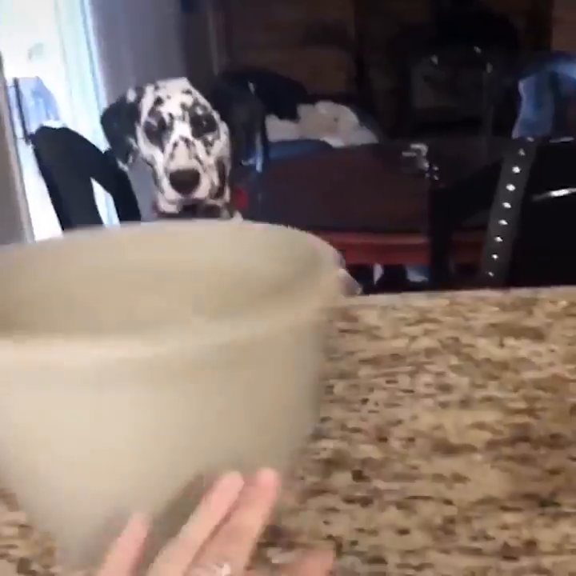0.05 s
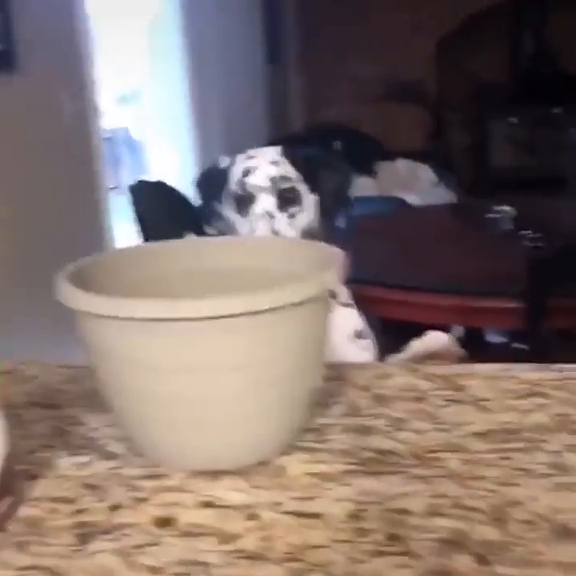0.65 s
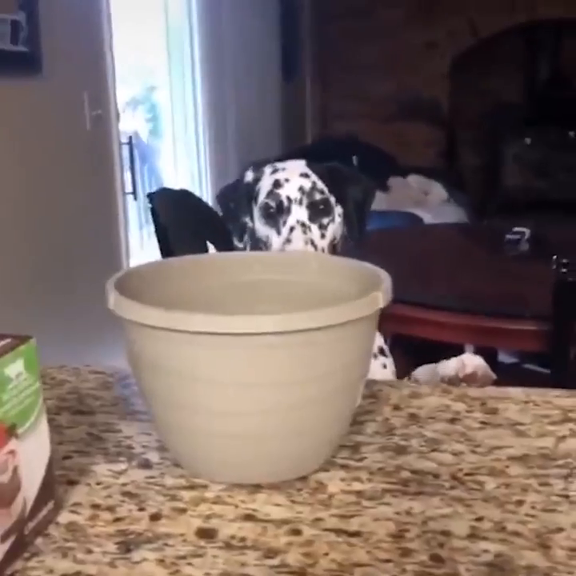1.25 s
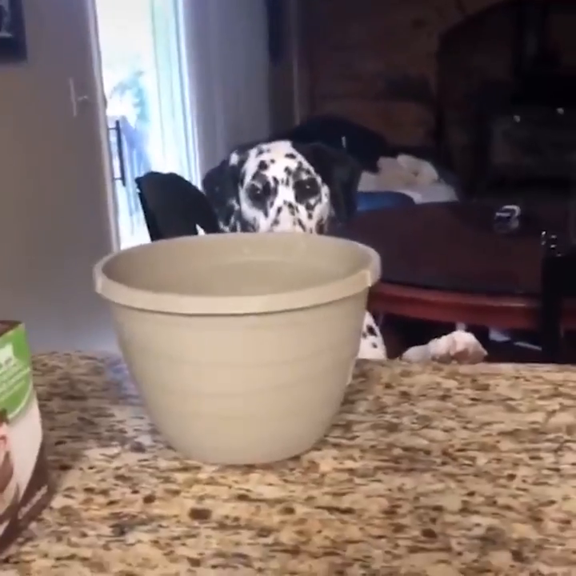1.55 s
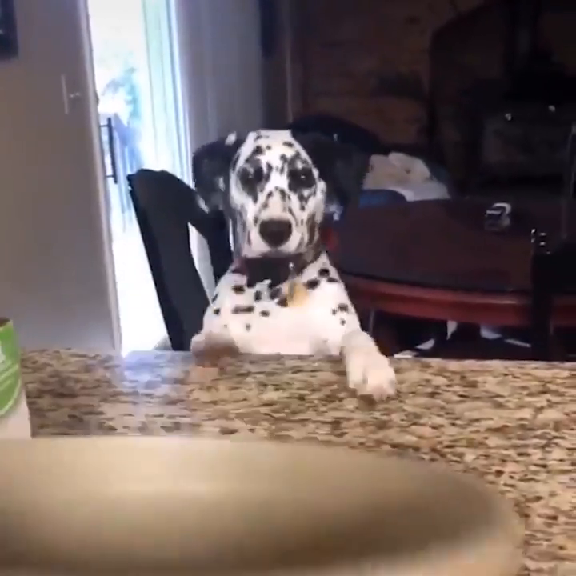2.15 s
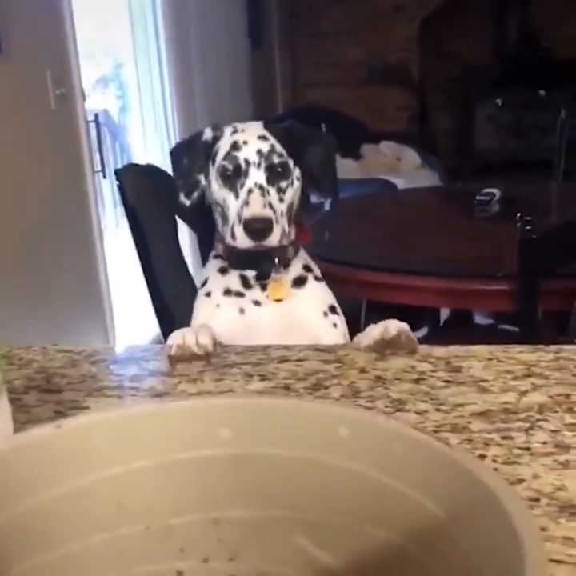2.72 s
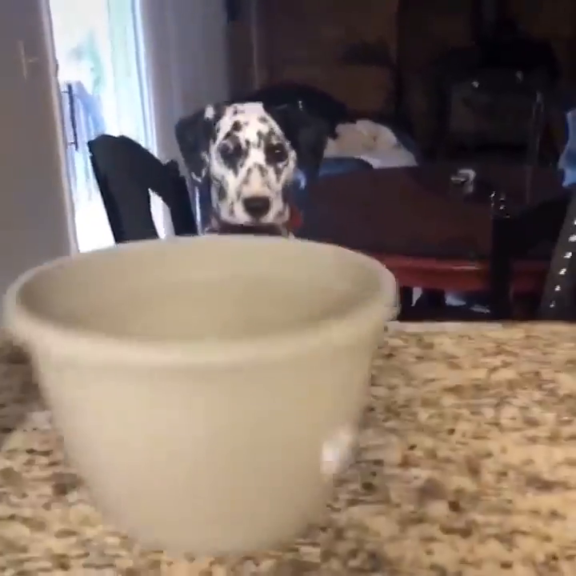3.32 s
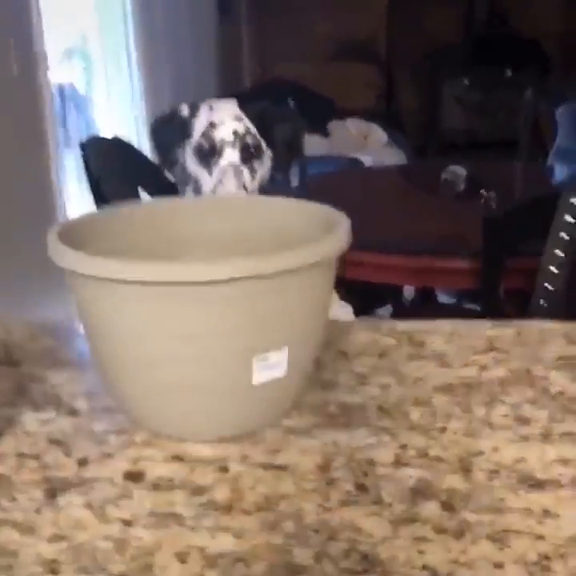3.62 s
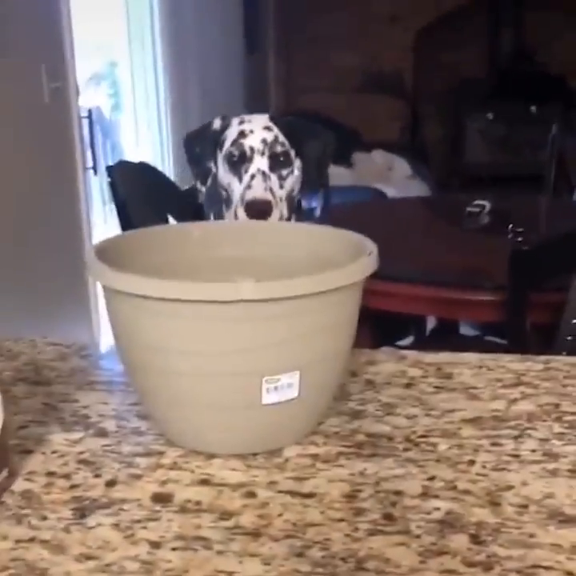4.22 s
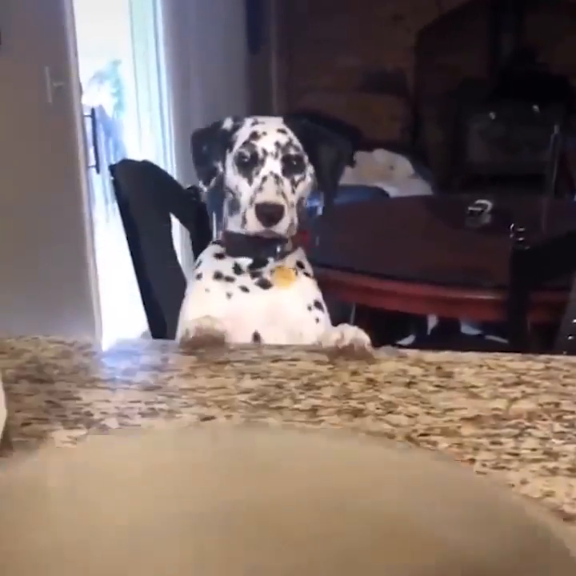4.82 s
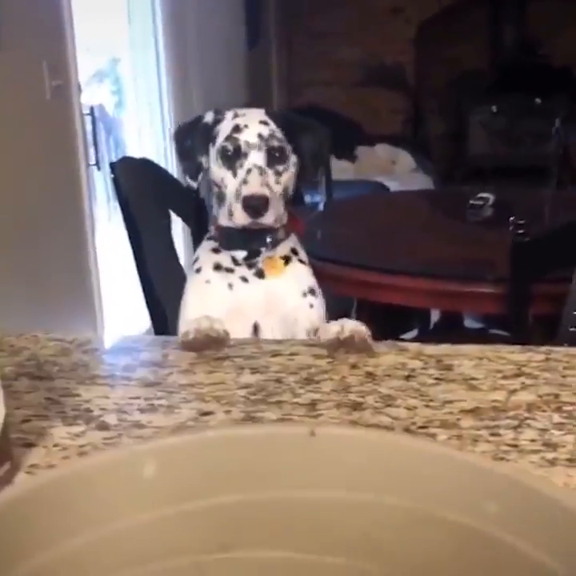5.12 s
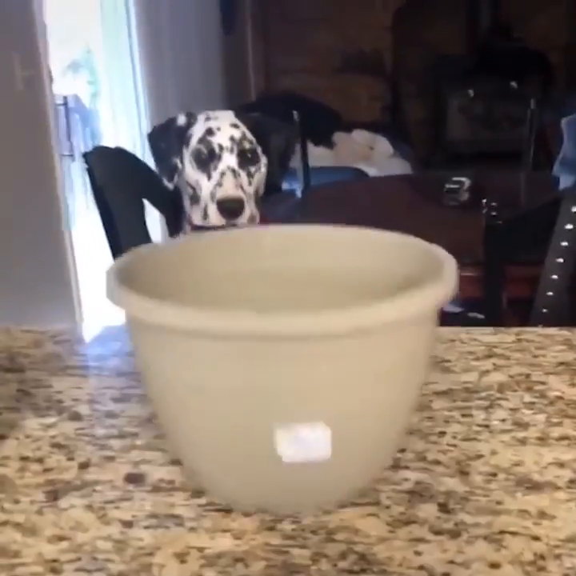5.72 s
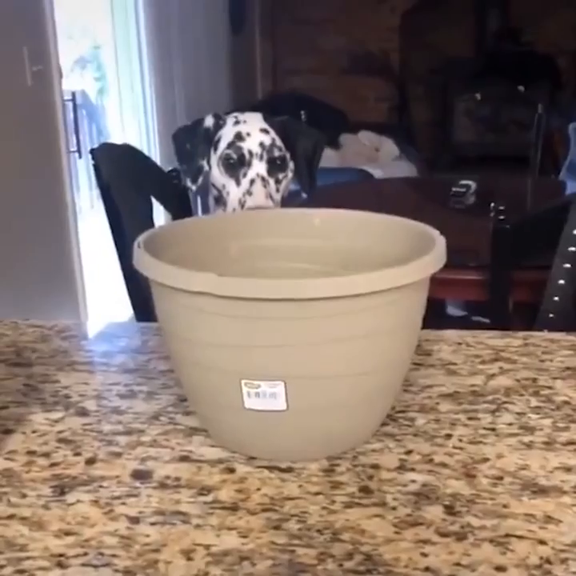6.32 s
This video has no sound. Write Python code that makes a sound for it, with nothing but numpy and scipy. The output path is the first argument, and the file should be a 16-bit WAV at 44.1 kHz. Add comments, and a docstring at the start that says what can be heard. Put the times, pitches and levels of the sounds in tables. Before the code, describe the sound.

An empty plastic flower pot is pushed and pulled across a stone countertop, scraping, knocking and thudding in an echoing kitchen.

```python
"""An empty plastic flower pot is pushed away and pulled back over a stone countertop, five moves in all.
Its base rasps on the stone, judders as it breaks loose and knocks as it rocks. Its thin wall clicks
and bends with low thuds. A hard kitchen echoes every sound, more so when the pot is far away.
Behind it all are soft room air and a faint hum that slowly swells and sinks."""
import sys
import numpy as np
from scipy import signal
from scipy.fft import rfft, irfft
from scipy.io import wavfile
from scipy.ndimage import uniform_filter1d

SR = 44100
rng = np.random.default_rng(int(sys.argv[2]) if len(sys.argv) > 2 else 0)


def materialize(psi):
    """Save the field psi as 16-bit PCM at rate SR to the path in sys.argv[1].

    A 1-D psi becomes a single channel; in a 2-D psi each row is a channel.
    """
    bounded = np.clip(np.atleast_2d(psi).T, -1, 1)
    quanta = np.round(bounded * 32767).astype(np.int16)
    wavfile.write(sys.argv[1], SR, quanta)


N = 289296

# the thin sound of a light touch on the wall: body/dB, knock/dB, tick/dB, clack/dB
LIGHT_TOUCH = (-11.5, -11, -13, 0)


def amp(db):
    """Turns decibels into a gain."""
    return 10 ** (np.asarray(db) / 20)


def unit_rms(x):
    """Scales a signal to an average (rms) level of 1."""
    return x / np.sqrt(np.mean(x ** 2) + 1e-20)


def value_at(points, hz):
    """Reads between the rows of a table, on a log-frequency axis."""
    f, value = np.transpose(points)
    return np.interp(np.log(hz + 1), np.log(f + 1), value)


def add(mix, start_s, sound):
    """Mixes a sound in at the given time."""
    part = mix[max(round(start_s * SR), 0):][:len(sound)]
    part += sound[:len(part)]


def band(x, lo_hz, hi_hz, order=2):
    """Keeps what lies between two frequencies."""
    return signal.sosfilt(signal.butter(order, [lo_hz, hi_hz], "band", fs=SR, output="sos"), x)


def coloured(x, spectrum):
    """Shapes the lows and highs of a scene-long sound, at level 1."""
    gains = amp(value_at(spectrum, np.fft.rfftfreq(N, 1 / SR)))
    return unit_rms(irfft(rfft(x) * gains, N))


def room_air(level_db=-55.5):
    """The still air of the room: a soft, deep noise."""
    # colour of the air: f/Hz, relative level/dB
    spectrum = [(15, -48.5), (25, -23.5), (58, -1.5), (81, -18), (127, -6), (144, -22), (178, -8),
                (214, -13.5), (351, -11), (380, -21.5), (411, -11.5), (548, -24), (694, -23.5),
                (1030, -30.5), (13000, -52)]
    return amp(level_db) * coloured(rng.standard_normal(N), spectrum)


def hum(hz=176, level_db=-58.5, waver_hz=1.49, beat_s=0.847, peak_s=0.93, depth=0.43):
    """A faint tone that wavers in pitch and swells in a slow beat."""
    t = np.arange(N) / SR
    beat = 1 + depth * np.cos(2 * np.pi * (t - peak_s) / beat_s)
    pitch = hz + waver_hz * unit_rms(uniform_filter1d(rng.standard_normal(N), size=4000))
    return amp(level_db) * beat * unit_rms(np.sin(2 * np.pi * np.cumsum(pitch) / SR))


def room_tail(build_s=0.0057, echoes_per_s=5000):
    """Crowded echoes build up, then die away at a different speed for each frequency."""
    # how long the kitchen rings: f/Hz, time to fall 60 dB/s
    ring_times = [(100, 1.13), (400, 0.716), (1500, 0.76), (4000, 0.63), (12000, 1.23)]
    # colour of its ringing: f/Hz, level/dB
    colour = [(80, -13), (220, -2), (420, -5.5), (800, -8.5), (2000, -6.5), (5000, -6), (12000, -10.5)]
    t = np.arange(SR) / SR
    echoes = rng.choice([-1., 1.], SR) * (rng.random(SR) < echoes_per_s / SR)
    echoes *= 1 - np.exp(-(t / build_s) ** 2)
    hz, times, bands = signal.stft(echoes, SR, nperseg=256)
    bands *= amp(-60 * times / value_at(ring_times, hz)[:, None])
    size = np.linalg.norm(signal.istft(bands, SR, nperseg=256)[1])
    bands *= amp(value_at(colour, hz))[:, None]
    return signal.istft(bands, SR, nperseg=256)[1] / size


def kitchen(pot, even_m=0.48, growth=0.55, change_hz=1.7, tails=3):
    """The room answers with a few dull echoes and a shifting tail, louder when the pot is far."""
    # how far away the pot is: t/s, distance/m
    path = [(0, 0.81), (.7, 0.56), (2.031, 0.54), (2.35, .28), (3.199, 0.43), (3.7, 0.53), (4.62, 0.67),
            (4.88, 0.32), (5.46, 0.34), (5.9, 0.72)]
    # echoes from counter, cupboards, ceiling and walls: delay/s, gain
    echoes = [(.0047, 0.23), (.0092, 0.12), (0.0145, 0.062), (0.024, 0.08), (0.032, 0.14), (0.043, 0.094),
              (0.058, 0.21)]
    t = np.arange(N) / SR
    metres = np.interp(t, *np.transpose(path))
    sent = pot * (metres / even_m) ** growth
    out = np.zeros(N)
    for k in range(tails):  # the tails take turns, like the changing echoes of a moving pot
        share = np.sqrt(2 / tails) * np.cos(2 * np.pi * (change_hz * t + k / tails))
        out += signal.fftconvolve(sent * share, room_tail())[:N]
    dulled = band(sent, 117.8, 2000, order=1)
    for delay, gain in echoes:
        add(out, delay, gain * dulled)
    return out


def bumps(span=1.375):
    """Dull rubs and bumps of the pot's body make short swells of rumble."""
    # each bump: t/s, level/dB, length/s, middle f/Hz
    swells = [(.31, -47, 0.11, 130), (0.581, -50.5, .07, 250), (1.138, -48.5, 0.14, 90),
              (1.194, -47.5, 0.16, 122), (2.069, -27.5, 0.18, 320), (2.21, -20, 0.046, 119.8),
              (2.796, -51, 0.11, 105.6), (2.791, -40.5, 0.081, 345), (4.155, -44, .09, 98),
              (4.7, -40, 0.12, 96.5), (4.962, -28, 0.086, 100), (5.528, -36, 0.079, 335)]
    out = np.zeros(N)
    for start, db, length, hz in swells:
        progress = np.linspace(0, 1, int(length * SR))
        rumble = band(rng.standard_normal(SR), hz / span, hz * span)[-len(progress):]
        add(out, start, amp(db) * unit_rms(rumble) * np.sin(np.pi * np.sqrt(progress)))
    return out


def flexes(glide_s=0.01044):
    """The wall bends under the hand. Slow, low waves arrive last, so each thud falls in pitch."""
    # each thud: t/s, peak level/dB, starting f/Hz, time to the peak/s
    thuds = [(.109, -31.5, 270, 0.0065), (2.068, -29.5, 260, 0.024), (2.078, -25, 439, 0.0067),
             (2.221, -22, 345, 0.0036), (2.245, -21, 152, 0.0084), (3.206, -17.5, 287, 0.0087),
             (3.227, -29, 85, .012), (4.939, -21.5, 289, .011), (5.474, -25.5, 310, 0.0084),
             (5.501, -34, 128, .013)]
    out, t = np.zeros(N), np.arange(SR // 5) / SR
    for start, db, hz, peak_s in thuds:
        cycles = np.cumsum(hz / (1 + t / glide_s) ** 1.103) / SR
        swell = t / peak_s * np.exp(1 - t / peak_s)
        add(out, start, amp(db) * swell * np.sin(2 * np.pi * cycles))
    return out


def ring(t, spread_db=0.5, detune=0.031, wall_above_hz=600):
    """The pot's own notes after one blow; those of the wall vary with the grip and the spot hit."""
    # notes of the base and wall: f/Hz, level/dB, time to fall 60 dB/s
    shell = [(313, -18.5, 0.047), (425, 2, 0.014), (695, -4, 0.02), (933, -5.5, 0.038), (1103, -4, .016),
             (1365, -4, 0.023), (1613, 9, 0.01), (1790, -7, 0.062), (2110, -7, 0.0084), (2367, -13, 0.031),
             (2766, -20.5, 0.093), (3817, 5, 0.0068), (4430, -45, .012)]
    # longer notes of the hollow inside: same columns
    hollow = [(247, -22, .14), (330, -22, .12), (374, -20, .17), (456, -13, .2), (499, -19, .16)]
    notes = np.vstack([shell, np.add(hollow, (0, -1, 0))])  # the hollow is turned down 1 dB
    hz, db, ring_s = notes.T[:, :, None]
    softer, phase, shift = rng.standard_normal((3, len(notes), 1)) * (hz > wall_above_hz)
    hz = hz * (1 + detune * shift)
    fade = amp(db - spread_db * softer - 60 * t / ring_s)
    return (fade * np.sin(2 * np.pi * hz * t + np.pi * phase)).sum(0)


def crack(samples=380, rise_s=.0015, fade_s=.0015):
    """A few milliseconds of crushed grit, nearly equally strong at all frequencies."""
    t = np.arange(samples) / SR
    burst = rng.standard_normal(samples) * np.exp(-t / fade_s) * (1 - np.exp(-t / rise_s))
    spectrum = rfft(burst)
    flattened = irfft(spectrum / (abs(spectrum) + 1e-9) ** .8, samples)
    return unit_rms(flattened * np.cos(np.pi / 2 * t / t[-1]))


def contact(levels_db, clack_hz, clack_span=1.508, body_lag_s=0.001):
    """One blow cracks and rings, heard as body, knock, tick and clack; the hollow body answers last."""
    # ranges of the body, knock and tick: lowest f/Hz, highest f/Hz
    ranges = [(215, 600), (600, 1300), (4500, 14000)]
    t = np.arange(SR // 2) / SR
    out, crunch = np.zeros((2, len(t)))
    add(crunch, 0, amp(-3.5) * crack())
    blow = ring(t) + band(crunch, 800, 9450)
    parts = [band(blow, *edges, order=3) for edges in ranges]
    parts.append(band(blow, clack_hz / clack_span, clack_hz * clack_span))
    for part, db, lag in zip(parts, levels_db, (body_lag_s, 0, 0, 0)):
        attack = part[:int(.012 * SR)]  # each level applies to the first 12 ms
        add(out, lag, amp(db) * part / np.sqrt(np.mean(attack ** 2)))
    return out


def clicks():
    """Light touches on the thin wall: the pitch depends on where they land, and hard ones tick more."""
    # each touch: t/s, strength/dB, clack f/Hz, hardness/dB
    touches = [(0.094, -44, 1740, 6), (1.165, -62, 1500, 6.5), (1.277, -58.5, 1700, 0.5),
               (1.319, -63, 1490, 1), (1.4466, -59, 2900, 8.5), (1.92, -64, 4200, 4),
               (2.0428, -25.5, 2000, -9), (2.055, -30, 2100, -12), (2.717, -47, 1830, -6),
               (3.2032, -39, 1620, -2.5), (3.26, -31, 3500, 8), (4.163, -65, 1910, 4),
               (4.626, -34, 2610, -1), (4.841, -43.5, 1785, -1), (4.856, -34.5, 1722, -0.5),
               (5.06, -39.5, 1420, -6), (5.471, -38, 2030, 1), (5.476, -35, 1770, -4),
               (5.666, -33, 2060, -10), (5.991, -47.5, 2840, 5.5), (6.147, -61.5, 2700, 10.5)]
    out = np.zeros(N)
    for start, db, hz, hardness_db in touches:
        add(out, start, contact(db + np.add(LIGHT_TOUCH, (0, 0, hardness_db, 0)), hz))
    return out


def knocks(clack_hz=1780, tick_db=-14):
    """The base lands or rocks: flat landings sound the hollow body, hard edge-on ones clack and tick."""
    # each landing: t/s, strength/dB, extra body/dB, lean from knock to clack/dB, hardness/dB
    landings = [(.105, -26.5, 10.5, -0.5, -10), (0.1435, -30, 9, -2.5, -1.5), (.231, -34, 1, 5.5, 16.5),
                (.3166, -33, 5.5, 0.5, 8), (.511, -44, -5, 0, 10), (.5559, -46, 3.5, 2, 17),
                (.775, -60.5, -10, -5, 2), (0.837, -58.5, -16, -5.5, -1), (2.0788, -25, 4.5, -3, 3.5),
                (2.1851, -26, 0.5, -1, -10.5), (2.2096, -29.5, 15, 2, 3), (2.2219, -20.5, 3, -2.5, -1),
                (2.2631, -23.5, -4, -1, 0), (2.2897, -29.5, -20, 1, -3), (2.3106, -37, 5.5, -7.5, -14),
                (2.4424, -29, -3, -2, 2), (2.602, -42.5, -2.5, -1.5, 3), (2.7891, -38, 2.5, -2.5, -12),
                (3.2764, -24.5, 4.5, -3, -1), (3.344, -25, 11.5, -0.5, 2), (3.4075, -38.5, 18, -7, 2),
                (3.4386, -34, 10.5, -4, -3.5), (3.795, -46, -3, -0.5, -20.5), (4.888, -17, 9, -1.5, -2),
                (4.9286, -37, 12, -9, 8.5), (4.9637, -27, 3.5, -1, -1), (5.104, -19, 4, -2, -5),
                (5.1301, -40.5, 16, 6.5, -4), (5.28, -50, -13, -1, -11), (5.519, -25.5, 3.5, 0.5, -26),
                (5.56, -41.5, 13.5, 2, 5), (5.6227, -41.5, 4.5, 6.5, 5), (5.7125, -44, -2, 1, -5),
                (5.9329, -48, 3, 2.5, 9.5)]
    out = np.zeros(N)
    for start, db, body_db, lean_db, hardness_db in landings:
        levels_db = db + np.array([body_db, -lean_db, tick_db + hardness_db, lean_db])
        add(out, start, contact(levels_db, clack_hz))
    return out


def grit(specks_per_s=13, strength_db=-4.5, spread_db=3):
    """Specks caught under the base make the wall click now and then."""
    # where they ring the wall: f/Hz
    pitches = [1300, 1900, 2700, 3800]
    out = np.zeros(N)
    for hz in pitches:
        sizes = amp(strength_db + spread_db * np.clip(rng.standard_normal(N), -2, 2))
        specks = sizes * (rng.random(N) < specks_per_s / len(pitches) / SR)
        out += signal.oaconvolve(specks, contact(LIGHT_TOUCH, hz))[:N]
    return out


def stone_grain(rub, spread_db=3):
    """The stone's grain changes under the base, so the colour of the rubbing keeps shifting."""
    bands = signal.stft(rub, SR, nperseg=256)[2]
    blur = np.outer(np.hanning(9), np.hanning(13))  # across frequency and time
    patches = unit_rms(signal.oaconvolve(rng.standard_normal(bands.shape), blur, "same"))
    return unit_rms(signal.istft(bands * amp(spread_db * patches), SR, nperseg=256)[1][:N])


def friction(slips_per_s=3200, spread_db=3.5, smooth_gain=0.67):
    """Tiny slips of the base give two sounds: a rasp that rings the wall, and the contact's own hiss."""
    # colour of the rasp: f/Hz, relative level/dB
    rasp = [(100, 2), (200, -10.5), (460, -5), (620, -8.5), (850, -2.5), (1100, 0.5), (1350, -6.5),
            (1700, -4.5), (2100, -8.5), (2700, -8), (3300, -11.5), (3800, -9), (5000, -19.5), (7000, -37.5)]
    # colour of the hiss: f/Hz, relative level/dB
    hiss = [(3000, -15.5), (4600, -2), (5500, -1.5), (7000, -0.5), (10000, -1.5), (13000, -3.5)]
    sizes = amp(spread_db * np.minimum(rng.exponential(1, N), 4))
    slips = unit_rms(sizes * rng.choice([-1, 1], N) * (rng.random(N) < slips_per_s / SR))
    rub = stone_grain(slips + smooth_gain * rng.standard_normal(N))
    return coloured(rub, rasp), coloured(rub, hiss)


def tremble(spread_db=1, step_s=.006):
    """The base sticks and slips, so the level of the rubbing trembles."""
    steps = np.arange(N) / SR / step_s
    grip = np.interp(steps, np.arange(N), rng.standard_normal(N))
    return unit_rms(amp(spread_db * grip))


def slide_level(rise_s, length_s, fall_db, start_db=-13, stop_s=0.062):
    """Rubbing gets louder as the hand speeds the pot up, softer as it slows, and ends when it stops."""
    t = np.arange(int(length_s * SR)) / SR
    ends = np.clip(np.minimum(t / .005, (length_s - t) / stop_s), 0, 1)
    return ends * amp(np.interp(t, [0, rise_s, length_s], [start_db, 0, -fall_db]))


def scrapes(hiss_fall_ratio=1.26, judder_fall_db=7, judder_hiss_db=-2.5, tone_span=1.054):
    """The base scrapes the stone: slides follow the hand's push; judders start at once and fade."""
    # the pot slides or the grip shifts:
    # t/s, rise/s, length/s, rasp/dB, hiss/dB, fall after the rise/dB (negative keeps growing)
    slides = [(0.215, .015, 0.43, -45.5, -47.5, 5.5), (0.57, 0.026, 0.49, -55.5, -64, 12),
              (1.022, 0.14, 0.42, -66, -66.5, 12), (1.874, 0.092, 0.18, -66.5, -74, 11.5),
              (2.07, 0.04, 0.42, -35, -41, 20.5), (2.64, 0.13, 0.38, -49, -53.5, 13),
              (3.115, 0.079, 0.23, -60, -60, -14), (3.287, 0.19, 0.68, -47.5, -52, 17.5),
              (4.145, 0.01, 0.22, -69.5, -67, 20), (4.673, 0.011, 0.23, -35, -43.5, 19.5),
              (4.829, 0.066, 0.45, -40.5, -44, 19.5), (5.476, 0.033, 0.67, -39.5, -41.5, 21.5)]
    # the base catches and squeaks, or sets the hollow droning: t/s, length/s, rasp/dB, tone/dB, f/Hz
    judders = [(.064, 0.054, -48.5, -53, 1690), (0.083, 0.14, -47.5, -61, 1720),
               (.232, .014, -52, -34.5, 1680), (0.318, 0.02, -30, -52, 1920),
               (.559, 0.014, -44.5, -43, 4060), (2.043, .012, -24.5, -28, 1700),
               (2.054, 0.041, -26, -29.5, 2440), (3.209, 0.086, -47, -43, 1940),
               (3.541, 0.13, -61.5, -53.5, 3750), (4.626, .01, -26.5, -23, 2610),
               (4.627, .03, -38, -28.5, 1206), (4.64, 0.038, -30.5, -31.5, 2630),
               (4.92, .08, -47, -22.5, 456), (5.128, .07, -52.5, -25.5, 451),
               (5.664, 0.0062, -55, -38.5, 3830), (5.69, 0.068, -86, -47.5, 2890)]
    rasp_level, hiss_level, tones = np.zeros((3, N))
    for start, rise, length, rasp_db, hiss_db, fall_db in slides:
        add(rasp_level, start, amp(rasp_db) * slide_level(rise, length, fall_db))
        add(hiss_level, start, amp(hiss_db) * slide_level(rise, length, hiss_fall_ratio * fall_db))
    specks = rasp_level * grit()
    for start, length, rasp_db, tone_db, hz in judders:
        progress = np.linspace(0, 1, int(length * SR))
        fade = amp(-judder_fall_db * progress) * signal.windows.tukey(len(progress), .1)
        add(rasp_level, start, amp(rasp_db) * fade)
        add(hiss_level, start, amp(rasp_db + judder_hiss_db) * fade)
        tone = band(rng.standard_normal(SR // 2), hz / tone_span, hz * tone_span)[-len(fade):]
        add(tones, start, amp(tone_db) * fade * unit_rms(tone))
    rasp, hiss = friction()
    return (rasp_level * rasp + hiss_level * hiss) * tremble() + tones + specks


def scene():
    """The pot moves to and fro on the counter, in the kitchen."""
    pot = knocks() + clicks() + scrapes() + flexes() + bumps()
    return (pot + kitchen(pot) + hum() + room_air())[None]


def record(dry, silent_s=.063, fade_in_s=.006, top_hz=13150):
    """Starts after a moment of silence, clips any overload and cuts the highest treble."""
    fade_in = np.clip((np.arange(N) / SR - silent_s) / fade_in_s, 0, 1)
    low_pass = signal.firwin(401, top_hz, window=("kaiser", 8), fs=SR)
    return signal.oaconvolve(np.clip(dry * fade_in, -1, 1), low_pass[None], "same")


dry = scene()
out = record(dry)
materialize(out)
```